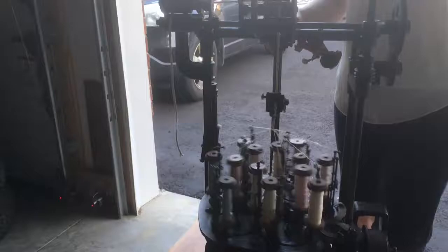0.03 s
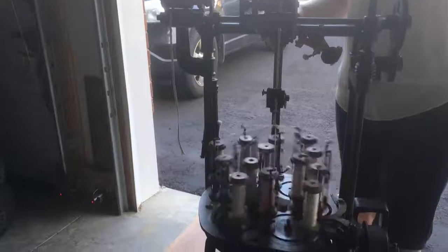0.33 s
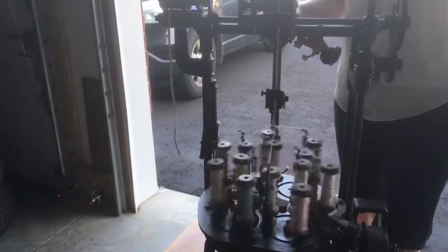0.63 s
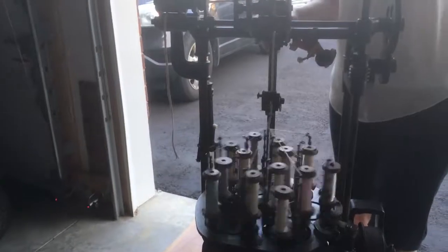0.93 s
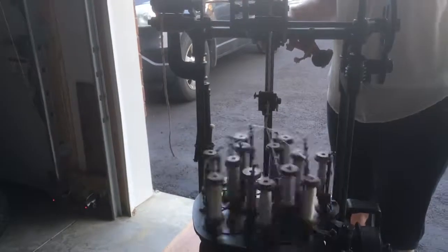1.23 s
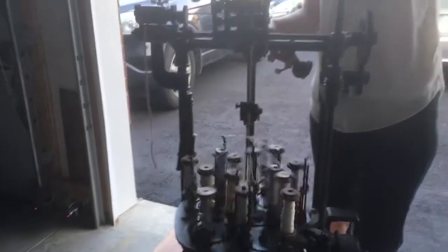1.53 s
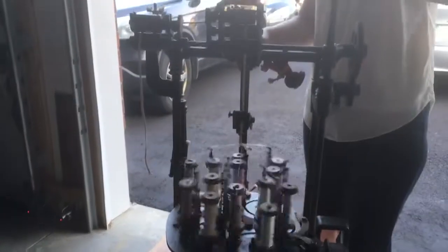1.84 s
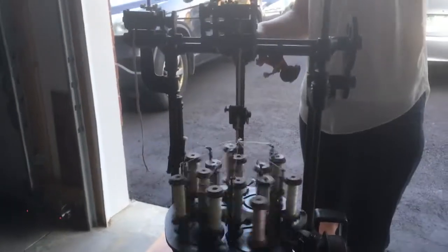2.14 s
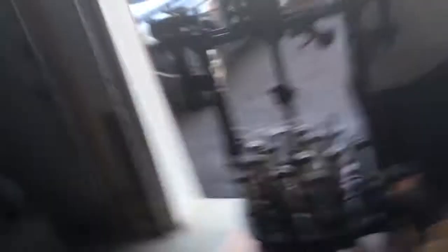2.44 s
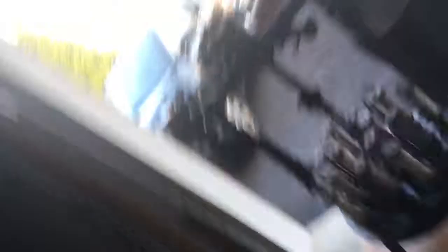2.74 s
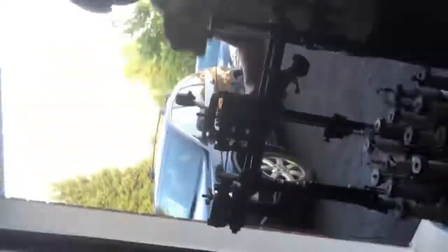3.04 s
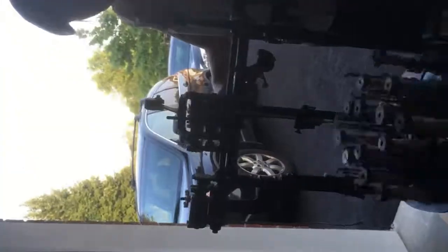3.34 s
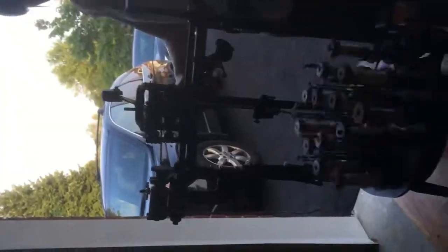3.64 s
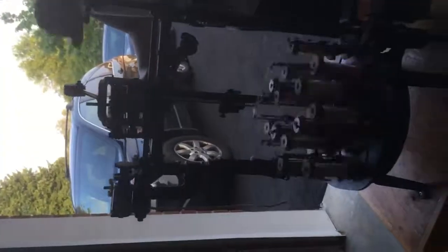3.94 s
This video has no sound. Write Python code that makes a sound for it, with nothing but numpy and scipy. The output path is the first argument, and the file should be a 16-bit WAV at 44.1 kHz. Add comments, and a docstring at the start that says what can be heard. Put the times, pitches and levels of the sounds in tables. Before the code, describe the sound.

An old braiding machine runs, its steel bobbin carriers clattering densely over grinding gears.

```python
"""In a workshop, an old braiding machine is running. Its steel bobbin carriers knock and chatter round
the track plate, which clanks at each blow. The frame booms at each heavy shove, loose bobbins tick,
and now and then a small steel part snaps, pings or clanks.
Under it all the gears grind and the drive hums."""
import sys
import numpy as np
from scipy import signal
from scipy.fft import rfft, irfft, next_fast_len
from scipy.io import wavfile
from scipy.ndimage import map_coordinates

SR = 44100
rng = np.random.default_rng(int(sys.argv[2]) if len(sys.argv) > 2 else 0)


def file_out(sig):
    """Save sig as 16-bit WAV at sys.argv[1]."""
    # one column per channel
    cols = np.atleast_2d(sig).T
    # limit, then scale
    lim = np.clip(cols, -1, 1)
    pcm = np.round(lim * 32767).astype(np.int16)
    wavfile.write(sys.argv[1], SR, pcm)


N = 176400

# The carriers' knocks. Each row: start in seconds, steel level in dB, track plate level in dB.
CARRIER_KNOCKS = [(0.119, -52, -30), (0.128, -21.5, -25), (0.174, -33, -24), (0.235, -29.5, -26),
                  (0.297, -30, -27.5), (0.329, -23.5, -22.5), (0.38, -29, -25.5), (0.478, -29.5, -23.5),
                  (0.511, -24.5, -31), (0.55, -43, -25), (0.562, -27, -28), (0.599, -28.5, -27),
                  (0.642, -30, -29), (0.663, -32.5, -40), (0.692, -30.5, -25), (0.736, -25.5, -22.5),
                  (0.785, -29, -25), (0.823, -30.5, -35), (0.839, -30, -22.5), (0.863, -25, -26.5),
                  (0.89, -33, -26), (0.918, -25, -22), (0.936, -25.5, -24.5), (1.056, -32.5, -25),
                  (1.109, -28, -30.5), (1.125, -35.5, -26), (1.157, -30, -26), (1.203, -25, -22.5),
                  (1.246, -27, -25), (1.262, -24.5, -36), (1.273, -27.5, -25), (1.33, -27, -23.5),
                  (1.381, -30, -26), (1.452, -30.5, -23), (1.474, -25.5, -25.5), (1.514, -25, -23.5),
                  (1.531, -24.5, -23), (1.652, -22.5, -23.5), (1.661, -27.5, -30), (1.713, -30, -24.5),
                  (1.726, -25, -24), (1.831, -23.5, -22.5), (1.867, -28, -28), (1.918, -36, -28.5),
                  (1.976, -30, -25), (2.021, -28.5, -26.5), (2.047, -24, -22.5), (2.082, -23.5, -21.5),
                  (2.094, -27, -25), (2.131, -29, -25.5), (2.217, -27.5, -25.5), (2.236, -27, -28),
                  (2.285, -24, -27.5), (2.321, -33, -30), (2.372, -25, -25), (2.386, -19.5, -20),
                  (2.399, -25, -39), (2.439, -25, -24), (2.454, -23.0, -24), (2.501, -32, -35),
                  (2.552, -27, -21.5), (2.583, -22.5, -23.5), (2.619, -20.5, -22.5), (2.65, -25.5, -23),
                  (2.691, -21.5, -27), (2.707, -20, -24), (2.735, -25.5, -27), (2.836, -29, -38),
                  (2.877, -25, -27), (2.908, -22.5, -24.5), (2.931, -23.5, -24), (3.013, -23, -23),
                  (3.028, -18.5, -23.5), (3.068, -22, -23), (3.131, -26.5, -30), (3.15, -25, -26),
                  (3.179, -21.5, -25.5), (3.223, -26.5, -42), (3.252, -25, -36), (3.349, -20.5, -25.5),
                  (3.39, -20, -23), (3.416, -29, -28), (3.441, -27.5, -38), (3.486, -24, -33),
                  (3.555, -22, -23.5), (3.567, -30, -37), (3.639, -23, -26.5), (3.65, -20, -22),
                  (3.687, -23, -24.5), (3.71, -27.5, -36), (3.8, -21.5, -22), (3.843, -27.5, -34),
                  (3.888, -24, -25.5), (3.943, -23, -28), (3.988, -19, -29)]
# How hard the gears work. Each row: time in seconds, level in dB.
GEAR_EFFORT = [(.15, -29.5), (.8, -27), (1.05, -33), (1.3, -28.5), (1.8, -31), (2.3, -27), (2.8, -27.5),
               (3.2, -25)]
# The bright tone of struck steel. Each row: frequency in Hz, boost or cut in dB.
STEEL_TONE = [(600, -29), (1500, -3), (2400, -0.5), (4600, 3), (4950, 0), (5300, 5), (5900, 3.5),
              (7900, -4), (9600, -1.5), (10400, -5), (11500, 2), (12800, 2.5), (15600, -4)]

START_S, TOP_HZ = 0.1194, 15850  # when the sound begins; the highest frequency heard
STEEL_ATTACK_S, PLATE_ATTACK_S = 0.00023, 0.0015  # an attack is how quickly a sound swells
CHATTER_T60_S = 0.051  # a t60 is the time a sound takes to fade by 60 dB


def carriers():
    """Steel hits steel: a short scrape, a bright click, a chatter of tiny hits, then the room's echo."""
    out, size, lead = np.zeros(N), SR // 5, SR // 20
    slide = amp(-9.5) * np.exp(-np.arange(lead, 0, -1) / SR / 0.0045)  # swells up to the strike
    chatter_shape = np.r_[slide, rise(STEEL_ATTACK_S) * fade(CHATTER_T60_S)][:size]
    click_shape = (rise(STEEL_ATTACK_S) * fade(0.0078))[:size]
    for start, db, _ in CARRIER_KNOCKS:
        chatter = contacts(size, per_s=1300, spread_db=2.5, scrape=0.45)
        chatter = tinted(chatter, depth_db=3.5, width_hz=330, tilt_db=5)  # each spot has its own tone
        add(out, start - lead / SR, amp(db) * chatter_shape * chatter)
        click = unit(signal.lfilter([1, -0.55], 1, rng.standard_normal(size)))
        click_db = db + 4 + 0.17 * (db + 34)  # harder knocks are crisper
        add(out, start, amp(click_db) * click_shape * click)
        echo = unit(signal.lfilter([1], [1, -0.35], rng.standard_normal(SR // 2)))  # walls dull the treble
        add(out, start, amp(db - 8.5) * rise(0.0074) * fade(0.22) * echo)
    return coloured(out, STEEL_TONE)


def track_plate():
    """Each knock shakes the track plate: a dense clank with a few clear notes."""
    # The tone of the clank. Each row: frequency in Hz, boost or cut in dB.
    plate_tone = [(120, -32), (440, -13.5), (590, -12), (770, 1.5), (950, -5), (1150, -2.5), (1650, 2.5),
                  (2350, -3.5), (3000, -13.5), (11000, -42.5)]
    # The notes the plate rings at. Each row: pitch in Hz, level in dB, t60 in seconds.
    plate_notes = [(439.6, -15, 0.5), (482.5, -8, 0.4), (528.5, -6, 0.16), (756.5, -4, 0.42),
                   (831, -1.5, 0.45), (1089, -4.5, 0.52)]
    clank, size = np.zeros(N), SR // 5
    first_blow = amp(-3.5) * fade(CHATTER_T60_S)
    shape = (rise(PLATE_ATTACK_S) * (first_blow + fade(0.28)))[:size]
    blows = [(start, db) for start, _, db in CARRIER_KNOCKS]
    for start, db in blows:
        rattle = contacts(size, per_s=1600, spread_db=2, scrape=0.79)
        rattle = tinted(rattle, depth_db=3, width_hz=90, tilt_db=0)  # each spot has its own pitches
        add(clank, start, amp(db) * shape * rattle)
    ring = ringing(blows, plate_notes, PLATE_ATTACK_S, scatter_db=-0.5, detune=0.0072)
    return amp(-3.5) * coloured(clank, plate_tone) + amp(-12) * ring


def frame():
    """The frame booms at each shove, and the running gears keep its lowest note droning."""
    # Heavy shoves on the frame. Each row: start in seconds, level in dB.
    shoves = [(0.136, -25.5), (0.182, -17.5), (0.293, -25), (0.377, -22.5), (0.491, -26.0), (0.692, -28),
              (0.854, -21), (0.92, -19.5), (1.129, -26), (1.203, -24), (1.271, -28), (1.339, -19.5),
              (1.474, -24), (1.652, -21.5), (1.716, -20), (2.091, -20), (2.399, -24), (2.452, -19.5),
              (2.552, -25.5), (2.744, -21), (3.015, -21), (3.436, -32), (3.552, -21.5), (3.692, -19)]
    # The frame's low notes. Each row: pitch in Hz, level in dB, t60 in seconds.
    frame_notes = [(258.4, -0.5, 0.19), (272.5, -3, 0.19), (294, -2.5, 0.14)]
    t = np.arange(N) / SR
    lowest_hz = frame_notes[0][0]
    drone = amp(level_at(t, GEAR_EFFORT) - 10) * np.sin(2 * np.pi * lowest_hz * t + wobble(per_s=22))
    booms = ringing(shoves, frame_notes, attack_s=0.021, scatter_db=1, detune=0.014)
    return drone + booms


def bobbins():
    """Loose bobbins tick, louder as the gears work harder, and each knock jolts out two more ticks."""
    out, size = np.zeros(N), 2048
    ticks_per_s, jolt_gap_s = 79, 0.014
    shape = (rise(STEEL_ATTACK_S) * fade(0.018))[:size]
    jolted = [(start + jolt_gap_s * wait, db - 5)
              for start, db, _ in CARRIER_KNOCKS for wait in np.cumsum(0.5 + rng.random(size=2))]
    count = int(ticks_per_s * N / SR)
    times = (np.arange(count) + 2 * rng.random(count)) / ticks_per_s
    running = list(zip(times, level_at(times, GEAR_EFFORT) - 12.5))
    for start, db in jolted + running:
        tick = tinted(rng.standard_normal(size), depth_db=5, width_hz=260, tilt_db=5)
        add(out, start, amp(db + rng.uniform(-3.25, 9.75)) * shape * tick)
    return coloured(out, STEEL_TONE)


def small_parts():
    """Catches snap, thin rods ping and a lever clanks, each ringing at one note."""
    # The blows on catches, rods and lever. Each row: start in seconds, level in dB.
    catch_blows = [(.599, -18), (1.116, -30), (1.226, -19), (1.832, -22), (2.41, -21), (3.028, -21),
                   (3.944, -24)]
    rod_blows = [(.608, -28), (1.232, -30), (2.408, -27), (2.932, -27), (3.445, -26.5), (3.946, -30)]
    lever_blows = [(1.157, -23.5), (1.976, -21)]
    snaps = ringing(catch_blows, [(11620, 0, 0.035)], attack_s=0.0004, scatter_db=1, detune=0.006)
    pings = ringing(rod_blows, [(6720, 0, 0.11)], attack_s=0.003, scatter_db=1, detune=0.003)
    clanks = ringing(lever_blows, [(1857, 0, 0.11)], PLATE_ATTACK_S, scatter_db=-1, detune=0)
    return snaps + pings + clanks


def gears():
    """The gears grind: tiny hits and scraping, with a fast flutter in loudness."""
    # The low tone of the grinding. Each row: frequency in Hz, boost or cut in dB.
    gear_tone = [(25, -23), (50, -14.5), (100, -12.5), (145, -18), (210, -3), (275, 11), (360, -6.5),
                 (470, -3), (590, -7.5), (780, 4), (1000, -0.5), (1650, 2), (3000, -7), (13000, -26.5)]
    flutter_db = 2.5 * wobble(per_s=75)
    level_db = level_at(np.arange(N) / SR, GEAR_EFFORT) - 4 + flutter_db
    grind = contacts(N, per_s=700, spread_db=2, scrape=1)
    return coloured(amp(level_db) * grind, gear_tone)


def drive():
    """The drive hums faintly on one low, unsteady note."""
    # How loud the hum is. Each row: time in seconds, level in dB.
    hum_levels = [(1.3, -59), (1.7, -54.5), (2.8, -52.5), (3.1, -61)]
    t, hum_hz = np.arange(N) / SR, 50
    return amp(level_at(t, hum_levels)) * np.sin(2 * np.pi * hum_hz * t + 0.74 * wobble(per_s=9.1))


def contacts(size, per_s, spread_db, scrape):
    """Tiny random hits of uneven strength, mixed with scraping noise."""
    hits = (rng.random(size) < per_s / SR) * np.sign(rng.standard_normal(size))
    hits *= amp(spread_db * rng.standard_normal(size))
    return unit(unit(hits) + scrape * rng.standard_normal(size))


def ringing(blows, notes, attack_s, scatter_db, detune):
    """Each blow rings the notes a little differently. Each note: pitch in Hz, level in dB, t60."""
    out, t = np.zeros(N), np.arange(SR // 2) / SR
    for start, db in blows:
        ring = np.zeros(len(t))
        for hz, note_db, t60 in notes:
            level_draw, pitch_draw, phase = rng.standard_normal(3)
            wave = np.sin(2 * np.pi * (hz * (1 + detune * pitch_draw) * t + phase))
            ring += amp(note_db + scatter_db * level_draw) * fade(t60) * wave
        add(out, start, amp(db) * rise(attack_s) * ring)
    return out


def tinted(x, depth_db, width_hz, tilt_db):
    """Give a sound random peaks and dips in its tone, and a random brightness."""
    hz = np.fft.rfftfreq(len(x), 1 / SR)
    bumps = map_coordinates(rng.standard_normal(512), [hz / width_hz], mode="wrap")
    tilt = (2 * rng.random() - 1) * hz / TOP_HZ
    return unit(irfft(rfft(x) * amp(depth_db * bumps + tilt_db * tilt), len(x)))


def coloured(x, tone):
    """Shape a sound with a tone table, keeping about the same overall power."""
    size = 8192
    hz, db = np.transpose(tone)
    grid = np.fft.rfftfreq(size, 1 / SR)
    gain = amp(np.interp(np.log(grid + 1), np.log(hz), db))
    cepstrum = irfft(np.log(gain))[:size // 2]  # used to make the filter ring only after a hit
    response = irfft(np.exp(rfft(np.r_[cepstrum[0], 2 * cepstrum[1:]], size)))
    average_gain = np.sqrt(np.mean(gain ** 2 * (grid < TOP_HZ)))
    return signal.fftconvolve(x, response / average_gain)[:N]


def amp(db):
    """Turn decibels into a multiplier."""
    return 10 ** (np.asarray(db) / 20)


def unit(x):
    """Scale a sound to an average power of 1."""
    return x / np.sqrt(np.mean(x ** 2) + 1e-20)


def add(track, start, sound):
    """Mix a sound into the track at a start time in seconds."""
    part = track[max(0, round(start * SR)):][:len(sound)]
    part += sound[:len(part)]


def level_at(times, levels):
    """Read a level in dB between the rows of a table."""
    return np.interp(times, *np.transpose(levels))


def wobble(per_s):
    """A smooth curve through per_s random points a second."""
    return map_coordinates(rng.standard_normal(2000), [np.arange(N) * per_s / SR], mode="wrap")


def fade(t60):
    """Half a second of dying away, by 60 dB every t60 seconds."""
    return np.exp(-np.log(1000) * np.arange(SR // 2) / SR / t60)


def rise(attack_s):
    """Half a second that starts softly and swells to full level."""
    return 1 - np.exp(-np.arange(SR // 2) / SR / attack_s)


def scene():
    """The whole machine, heard from one spot after a brief silence."""
    machine = carriers() + bobbins() + small_parts() + track_plate() + frame() + gears() + drive()
    return (machine * (np.arange(N) / SR > START_S))[None]


def record(dry):
    """Cut away the very highest treble, above TOP_HZ."""
    size = next_fast_len(N + SR // 2)
    kept = np.fft.rfftfreq(size, 1 / SR) < TOP_HZ
    return irfft(rfft(dry, size) * kept, size)[:, :N]


dry = scene()
out = record(dry)
file_out(out)
```